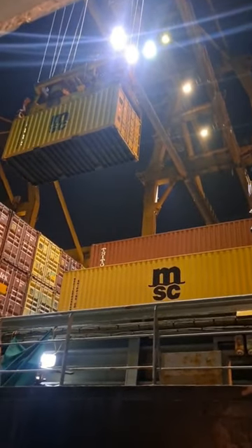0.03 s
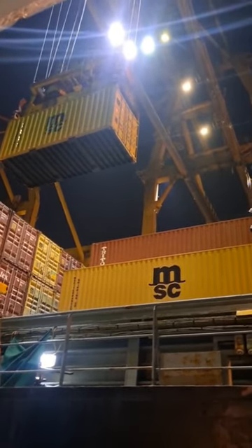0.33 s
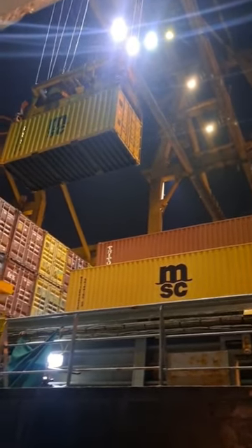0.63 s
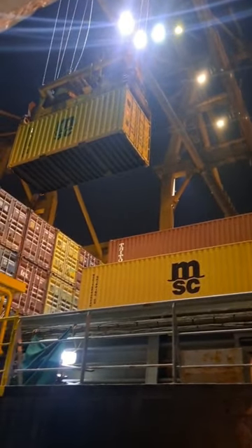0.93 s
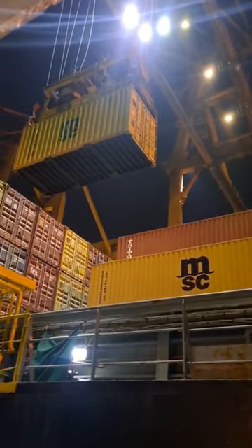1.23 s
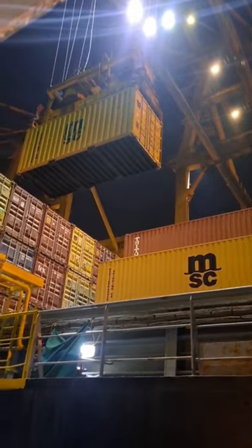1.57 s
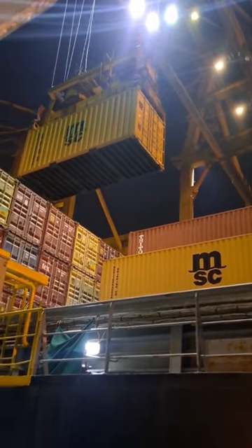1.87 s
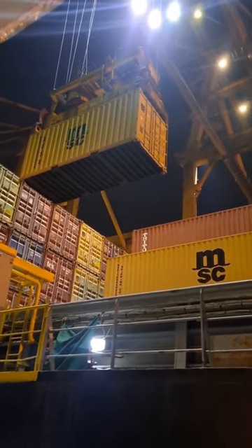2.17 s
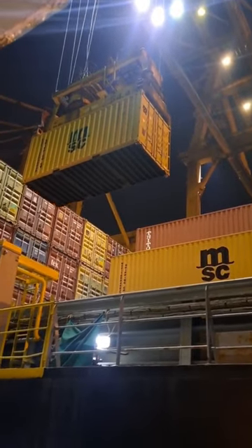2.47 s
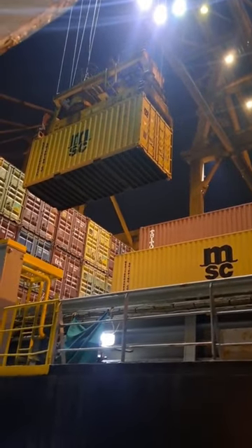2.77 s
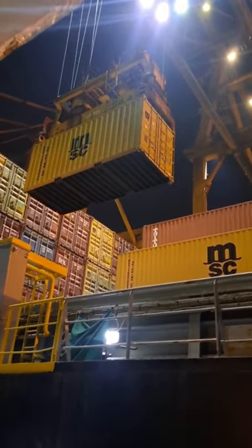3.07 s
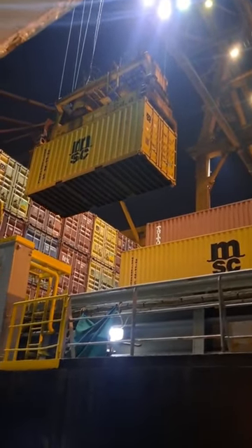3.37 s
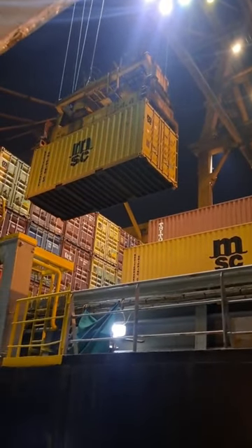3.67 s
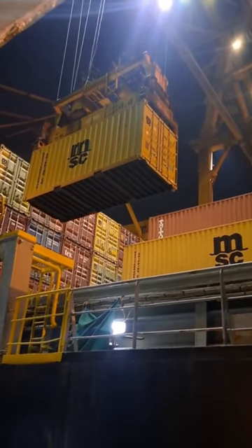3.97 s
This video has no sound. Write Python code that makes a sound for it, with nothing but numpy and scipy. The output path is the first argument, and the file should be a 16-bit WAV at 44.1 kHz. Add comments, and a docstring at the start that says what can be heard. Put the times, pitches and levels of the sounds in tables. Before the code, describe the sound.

A moored ship's generator drones and clatters throughout under a steady roar of fans, heard from the quay. Crane ropes faintly hiss and tap. At about 1 second the crane's motors hum louder until nearly 3 seconds, and a rope sings thinly until just past 2. A thin whine swells around 3.5 seconds, a rope zings at 3.7, and a sharp knock rattles and rings on steel at 3.9.

```python
"""Container quay at night

A moored ship's six-cylinder diesel generator drones and clatters among steel walls.
Fans roar, ducts howl and the drives of a working gantry crane hum.
Its hoist ropes hiss, tap and sing on a sheave; near the end they zing loudly,
then a knock on steel rattles and rings."""
import sys
import numpy as np
from scipy import signal
from scipy.fft import rfft, irfft
from scipy.io import wavfile

SR = 44100
rng = np.random.default_rng(int(sys.argv[2]) if len(sys.argv) > 2 else 0)


def log_audio(samples):
    """Write samples as a 16-bit WAV file to the path given in sys.argv[1]."""
    # one column per channel
    frames = np.atleast_2d(samples).T
    # limit to full scale, then quantise
    limited = np.clip(frames, -1, 1)
    pcm = np.round(limited * 32767).astype(np.int16)
    wavfile.write(sys.argv[1], SR, pcm)


N = 176400


def exhaust(firings):
    """Deep generator boom, plus weaker shaft orders from unequal cylinders and thin upper whines."""
    # (multiple of firing rate, level [dB])
    harmonics = [(2, -22.5), (4, -20)]
    # (multiple of shaft rate, level [dB], left-right [dB])
    orders = [(9, -38, 4), (10, -37.5, 4), (11, -37.5, 6), (13, -36, 6), (14, -34.5, 9), (15, -40, 0),
              (16, -45, 3), (18, -43, -5), (24, -37, 2), (30, -48, 1), (33, -47, 2), (57, -56, 9),
              (63, -53, 10), (72, -52.5, 13), (84, -56, 2), (102, -51, -9), (108, -60, 0), (117, -60, 0),
              (123, -58.5, 4), (129, -60, 0), (156, -63, 0), (171, -61, 0)]
    firings_per_turn = 3
    boom = sum(-np.cos(2 * np.pi * k * firings) * undb(db + .45 * walk(5.8)) for k, db in harmonics)
    out = boom * pan(5.5)
    for k, db, side_db in orders:
        cycles = k * firings / firings_per_turn + rng.random()
        out += np.cos(2 * np.pi * cycles) * undb(db + 1.5 * walk(1.9)) * pan(side_db)
    return np.sqrt(2) * out


def clatter(firings):
    """Each firing knocks the engine; steel walls smear the knocks into a buzzing wash."""
    # (frequency [Hz], relative density [dB])
    spectrum = [(200, -22), (350, -5), (600, -0.5), (1000, -10), (1500, -7), (2200, -21), (3500, -29),
                (7000, -49)]
    level_db, scatter_db = -42.5, 3.2
    onsets = np.flatnonzero(np.diff(np.floor(firings)))
    pulses = np.zeros(N)
    pulses[onsets] = undb(scatter_db * rng.standard_normal(N)[:len(onsets)])
    return undb(level_db) * colour(walls(pulses, t60_s=.68), spectrum)


def knock():
    """A rough blow and its echoes travel along steel, arrive as falling chirps and ring."""
    # (time [s], level [dB], left-right [dB])
    hits = [(3.882, -25, 13), (3.911, -40, -8.5), (3.93, -41, 2), (3.943, -38.5, -4), (3.977, -42, 6)]
    # (frequency [Hz], relative density [dB])
    spectrum = [(2000, -29.5), (3300, -3.5), (4500, -3), (6200, -2.5), (7600, -11), (10000, -39)]
    blows = sum(fade(start_s, t60_s=.014) * undb(db) * pan(side_db) for start_s, db, side_db in hits)
    ring = fade(hits[0][0], t60_s=.94) * undb(-39)
    burst = rng.standard_normal((2, N)) * (blows + ring)
    response = unit(undb(over_hz(spectrum)))
    return along_steel(irfft(rfft(burst) * response, N), travel_s=.0135)


def rope_zings():
    """Each slip runs down the hoist rope and arrives treble first."""
    # (time [s], level [dB], t60 [s])
    slips = [(1.01, -47.5, 2.2), (1.83, -56.5, .8), (3.664, -36.5, 1.8)]
    # (frequency [Hz], relative density [dB])
    spectrum = [(700, -9), (1500, 3), (2500, 5), (3600, -3.5), (5500, -3.5), (8000, -8.5), (10500, -20),
                (13500, -20), (15500, -33)]
    attack_s = .054
    envelope = sum(undb(db) * fade(start_s, t60_s) * np.clip((times() - start_s) / attack_s, 0, 1)
                   for start_s, db, t60_s in slips)
    return along_steel(diffuse(spectrum) * envelope, travel_s=.08)


def rope_hiss():
    """Ropes hiss as they run over the sheaves."""
    # (frequency [Hz], relative density [dB])
    spectrum = [(1500, -10.5), (3400, -2.5), (4300, 1.5), (5700, 1), (7000, -3), (8500, -4.5), (10300, -18),
                (13000, -15), (15500, -18)]
    # (time [s], level [dB])
    levels = [(0, -51.5), (.25, -52), (.95, -53), (1.4, -52.5), (1.75, -53), (2.1, -52), (2.4, -53),
              (3.4, -53.5), (3.57, -51.5), (3.7, -52)]
    return diffuse(spectrum) * undb(curve(levels) + .4 * walk(17))


def rope_taps():
    """Ropes tap their guides, each tap with its own brightness."""
    # (time [s], level [dB], peak [Hz], t60 [s])
    taps = [(.075, -54, 7800, 0.27), (.225, -54, 7700, .25), (.37, -58, 7800, .2),
            (1.075, -58.5, 7500, .45), (1.92, -50.5, 6600, 0.39), (2.055, -53, 6000, .2)]
    out = 0
    for start_s, db, hz, t60_s in taps:
        spectrum = [(hz / 10, -60), (hz / 2, -18), (hz, 0), (hz * 2, -36)]
        out += diffuse(spectrum) * fade(start_s, t60_s) * undb(db)
    return out


def sheave():
    """A rope rubs in its groove and sings thinly; the note sinks as it settles."""
    # (frequency [Hz], width [Hz], relative level [dB])
    resonances = [(2390, 500, 0.5), (5430, 250, 0.5), (6000, 600, -1.5), (12000, 1600, -12.5)]
    # (time [s], level [dB])
    levels = [(1.0, -89), (1.1, -61), (1.42, -60), (1.55, -71), (1.85, -62), (2.15, -66), (2.3, -89)]
    # (time [s], pitch ratio)
    glide = [(1.1, 1), (1.4, 1.02), (1.65, 1), (2.2, 0.94)]
    out = 0
    for hz, width_hz, db in resonances:
        cycles = np.cumsum(hz * curve(glide)) / SR
        rub = np.array([walk(width_hz) + 1j * walk(width_hz) for _ in range(2)])
        out += np.real(rub * np.exp(2j * np.pi * cycles)) * undb(db)
    return out * undb(curve(levels)) * pan(-2)


def winch_drives():
    """Two drives hum and beat, louder under load."""
    # (frequency [Hz], relative level [dB])
    hums = [(224.3, -4), (228.4, -7)]
    # (time [s], gain [dB])
    load = [(0, -36.5), (.6, -37), (1.02, -27.5), (1.35, -30.5), (1.8, -31.5), (2.3, -33), (2.7, -30),
            (3.05, -42.5), (3.5, -41), (4, -43)]
    return sum(tone(hz) * undb(db) for hz, db in hums) * undb(curve(load) - 1) * pan(3)


def whines():
    """Thin machine whines swell and fade."""
    # (frequency [Hz], left-right [dB])
    tones = [(959.5, -8), (1184.5, 5), (1451, 12), (1480.3, 1)]
    # per whine: (time [s], level [dB])
    levels = [
        [(0, -55), (.7, -59.5), (1.6, -59), (2.05, -49), (2.3, -61), (2.55, -47), (3.1, -51.5), (3.35, -56),
         (3.55, -41.5), (3.8, -54), (4, -48)],
        [(0, -60), (1.3, -53.5), (2.1, -59), (3.4, -60), (4, -58)],
        [(0, -65), (1.8, -57.5), (2.8, -67.5), (3.5, -48.5), (4, -67)],
        [(0, -63.5), (.8, -59.5), (1.7, -53.5), (2.3, -60), (2.7, -59), (3.2, -64), (4, -60)],
    ]
    return sum(tone(hz) * undb(curve(level) + .2 * walk(7)) * pan(side_db)
               for (hz, side_db), level in zip(tones, levels))


def fans():
    """Fans hum in wavering tones."""
    # (frequency [Hz], level [dB], left-right [dB])
    hums = [(55.8, -38.5, 4), (75, -41, 5), (90.8, -35.5, 4), (248, -47, 3), (260.8, -40, 3),
            (348.5, -45, 3), (388, -49, 2), (414.6, -47, 2), (521, -53, 3), (782.3, -55, 12)]
    return sum(tone(hz) * undb(db + 1.5 * walk(1.7)) * pan(side_db) for hz, db, side_db in hums)


def ducts():
    """Rushing air howls in the ducts, unsteady in pitch."""
    # (frequency [Hz], pitch wander [fraction], wander rate [Hz], level [dB])
    howls = [(384.8, 0.04977, 8.86, -36.5), (87.9, .04, 5, -35)]
    return pan(3.5) * sum(tone(hz, wander, rate_hz) * undb(db + 1.5 * walk(10))
                          for hz, wander, rate_hz, db in howls)


def roar():
    """Air rushes through ducts and fans; the midrange swells slightly."""
    # (frequency [Hz], relative density [dB])
    spectrum = [(20, -42), (33, -19), (48, 0), (72, -2.5), (92, -.5), (112, -1), (145, -9), (192, -11.5),
                (228, -8), (270, -12), (312, -10), (350, -6.5), (410, -8), (470, -13.5), (640, -18),
                (760, -15), (850, -16.5), (925, -19.5), (1010, -18.5), (1110, -22.5), (1550, -26),
                (2300, -29.5), (3500, -35.5)]
    # (time [s], midrange gain [dB])
    swell = [(0, 1), (1, -0.5), (1.7, 1), (2.5, 0.5), (3.1, 1), (3.65, 0.5), (4, -0.5)]
    level_db, flicker_db = -25.6, .62
    mid_hz, top_hz = 820, 3325
    air = signal.sosfilt(signal.butter(4, top_hz, fs=SR, output="sos"), diffuse(spectrum))
    midrange = irfft(rfft(air) * over_hz([(mid_hz / 2, 0), (mid_hz, 1), (mid_hz * 2, 0)]), N)
    air += midrange * (undb(curve(swell)) - 1)
    return air * undb(level_db + flicker_db * walk(25))


def along_steel(x, travel_s):
    """Bending waves: the delay is travel_s at ref_hz and goes as 1 / sqrt(frequency)."""
    ref_hz = 5000
    hz = np.fft.rfftfreq(2 * N, 1 / SR)
    lag_cycles = 2 * travel_s * np.sqrt(ref_hz * hz)
    return irfft(rfft(x, 2 * N) * np.exp(-2j * np.pi * lag_cycles))[..., :N]


def walls(x, t60_s):
    """Dense echoes from hull and container stacks, different on each side."""
    tail = rng.standard_normal((2, N)) * np.exp(-np.log(1000) * times() / t60_s)
    return irfft(rfft(x) * rfft(tail), N)


def diffuse(spectrum):
    """Noise from all around: alike on both sides in the bass, unrelated in the treble."""
    # (frequency [Hz], left-right correlation before clipping to 0-1)
    likeness = [(60, 9), (130, 2.5), (290, 0.47), (640, 0.83), (1400, -2.3), (3000, 0)]
    # (frequency [Hz], left-right [dB])
    balance = [(60, -1), (110, 1.5), (200, 0.5), (380, 3.5), (690, 4.5), (1280, -0.5), (4000, 1),
               (8000, -4), (14000, -1.5)]
    mid, side = rfft(rng.standard_normal((2, N)))
    alike = np.clip(over_hz(likeness), 0, 1)
    stereo = mid * np.sqrt(1 + alike) + np.array([[1], [-1]]) * side * np.sqrt(1 - alike)
    return colour(irfft(stereo * pan(over_hz(balance)), N), spectrum)


def tone(hz, wander=.00081, rate_hz=2.5):
    """Sine whose pitch wanders by the fraction wander; rms 1."""
    cycles = np.cumsum(hz * (1 + wander * walk(rate_hz))) / SR + rng.random()
    return np.sqrt(2) * np.sin(2 * np.pi * cycles)


def walk(rate_hz):
    """Smooth random drift; rms 1."""
    hz = np.fft.rfftfreq(N, 1 / SR)
    return unit(irfft(rfft(rng.standard_normal(N)) * np.exp(-(hz / rate_hz) ** 2) * (hz > 0), N))


def fade(start_s, t60_s):
    """Exponential decay from start_s."""
    age_s = times() - start_s
    return (age_s > 0) * np.exp(-np.log(1000) * np.abs(age_s) / t60_s)


def colour(x, spectrum):
    """Filter by (frequency [Hz], gain [dB]) rows; rms 1."""
    return unit(irfft(rfft(x) * undb(over_hz(spectrum)), N))


def pan(side_db):
    """Constant-power left and right gains."""
    gains = undb(np.array([[.5], [-.5]]) * side_db)
    return gains / np.sqrt(np.mean(gains ** 2, axis=0))


def curve(rows):
    """Interpolate (time [s], value) rows per sample."""
    return np.interp(times(), *np.array(rows).T)


def over_hz(rows):
    """Interpolate (frequency [Hz], value) rows per FFT bin, on a log axis."""
    hz, value = np.array(rows, float).T
    return np.interp(np.log(np.fft.rfftfreq(N, 1 / SR) + 1e-9), np.log(hz), value)


def unit(x):
    return x / np.sqrt(np.mean(x ** 2))


def undb(db):
    return 10 ** (np.asarray(db) / 20)


def times():
    return np.arange(N) / SR


def scene():
    """Generator, machinery, ventilation and hoist, summed in stereo."""
    firing_hz, speed_wander = 29.607, .0007
    firings = np.cumsum(firing_hz * (1 + speed_wander * walk(.75))) / SR  # running count
    generator = exhaust(firings) + clatter(firings)
    machinery = fans() + winch_drives() + whines()
    ventilation = ducts() + roar()
    hoist = rope_hiss() + rope_zings() + sheave() + rope_taps() + knock()
    return generator + machinery + ventilation + hoist


def record(dry):
    """Short fades at both ends, then a steep low-pass."""
    edge_s, top_hz = .003, 15450
    ramp = np.clip(np.minimum(times(), times()[::-1]) / edge_s, 0, 1)
    edges = np.sin(np.pi / 2 * ramp) ** 2
    return signal.sosfilt(signal.ellip(8, .1, 70, top_hz, fs=SR, output="sos"), dry * edges)


dry = scene()
out = record(dry)
log_audio(out)
```